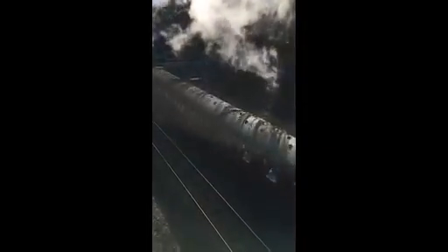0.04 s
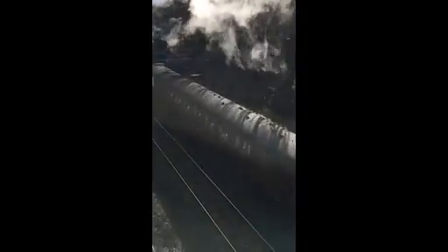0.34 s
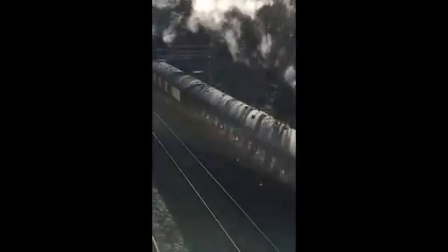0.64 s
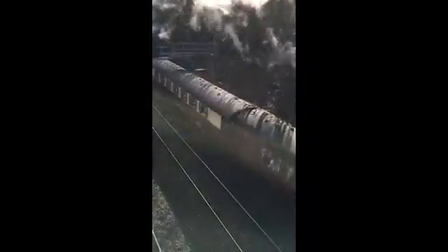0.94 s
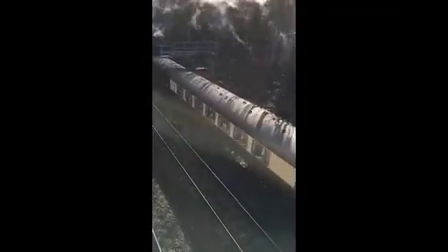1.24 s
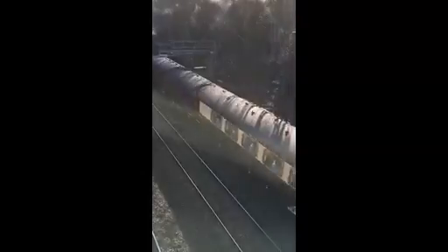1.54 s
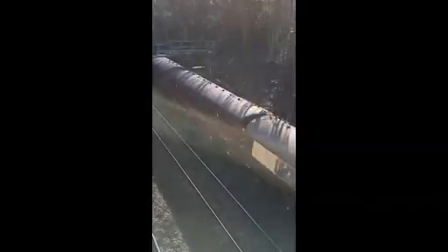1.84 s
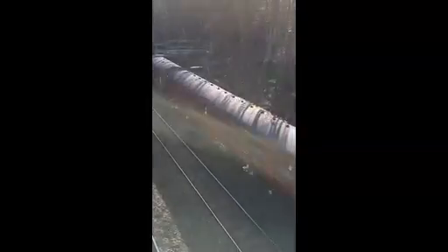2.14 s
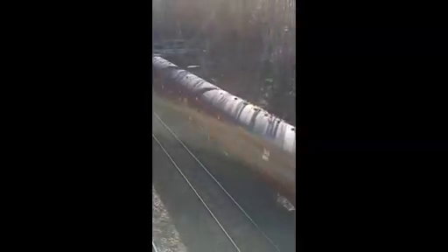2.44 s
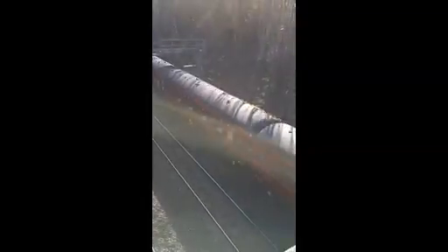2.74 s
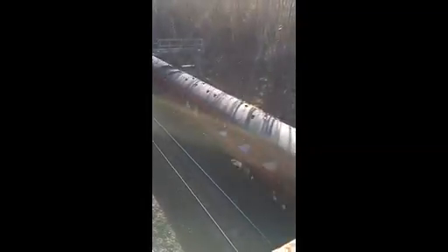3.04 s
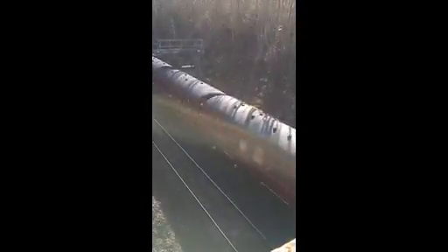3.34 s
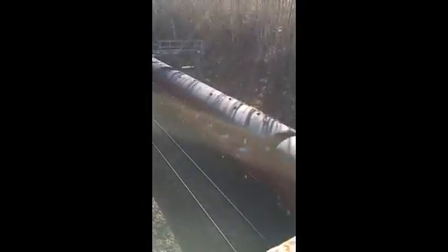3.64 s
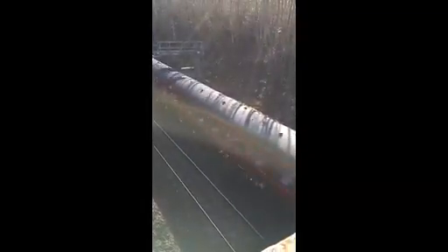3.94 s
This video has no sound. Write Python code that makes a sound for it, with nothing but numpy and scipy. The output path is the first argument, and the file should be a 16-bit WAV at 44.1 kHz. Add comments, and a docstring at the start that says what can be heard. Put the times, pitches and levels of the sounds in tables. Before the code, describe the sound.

A passenger train rolls past with a steady rushing rumble and wheels clattering over rail joints.

```python
"""A train of passenger coaches rolls past below, at a steady speed.
From the start, wheels and rails roar and the running gear knocks dully, over a low drone that
fades after the first second. Five bogies come by in turn, their wheel discs ringing and hissing.
At 1.6 s a coach body thuds heavily once. In the second half the wheels clatter more often over
rail joints and the rails sing; near the end the drone returns faintly."""
import sys
import numpy as np
from scipy import signal
from scipy.fft import rfft, irfft
from scipy.io import wavfile

SR = 44100
rng = np.random.default_rng(int(sys.argv[2]) if len(sys.argv) > 2 else 0)


def unload_wav(signal):
    """Save mono or channel-first audio to the path in sys.argv[1] as 16-bit WAV at rate SR, clipped to [-1, 1]."""
    wavfile.write(
        sys.argv[1],
        SR,
        np.round(np.clip(np.atleast_2d(signal).T, -1, 1) * 32767).astype(np.int16),
    )


N = 176400
T, HZ = np.arange(N) / SR, np.fft.rfftfreq(N, 1 / SR)


# Spectrum of the rails. Each row: frequency in Hz, relative density in dB.
ROAR_SPECTRUM = [(300, -21), (470, -7), (560, -2.5), (680, -1), (780, -5), (920, -3.5), (1080, -9),
                 (1230, -13), (1600, -19), (2300, -31), (2800, -44.5)]
# Envelope of the roar. Each row: time in seconds, relative level in dB.
ROAR_ENVELOPE = [(0, -21), (.4, -17.5), (.56, -19), (.72, -23), (.82, -18.5), (.9, -22.5), (1.3, -18),
                 (1.48, -20.5), (1.72, -19.5), (1.93, -18), (2.25, -19), (2.55, -19.5), (2.75, -18.5),
                 (2.98, -19.5), (3.2, -18), (3.43, -21.5), (3.52, -23), (3.74, -19), (3.9, -17.5),
                 (4, -21.5)]

def rail_roar():
    """Roughness excitation: steel rolling on steel drives the rails over a broad band."""
    roar = noise(colour(ROAR_SPECTRUM)) * level(ROAR_ENVELOPE)
    return roar * waver(rate_hz=18, depth_db=1.28) * amp(-2)


# Modes of a wheel disc. Each row: frequency in Hz, width in Hz, relative level in dB.
DISC_MODES = [(688, 50, -30.5), (1389, 120, -40.5), (1870, 164, -34), (2487, 170, -40.5), (3210, 190, -41),
              (3990, 280, -47), (5800, 710, -56.5)]
# Passing bogies. Each row: time when nearest and half length in seconds, then each mode's gain in dB.
BOGIE_PASSES = [(.17, 0.22, 4, 11.5, -2.5, 3.5, 2.5, -4, 0), (1.12, 0.49, -9, 8.5, -5.5, -2, -2.5, -9, -2),
                (2.03, 0.28, -4, -3, 0.5, 2, -0.5, 0.5, -2), (2.72, 0.24, -12, -1, 3.5, 4.5, 4.5, 6.5, 6.5),
                (3.48, 0.28, -5, -8, 1, -1.5, -1.5, 3.5, 2)]

def wheel_ring():
    """Modal resonance: randomly driven wheel discs ring, swelling as each bogie passes."""
    out = np.zeros(N)
    for nearest, half, *gains_db in BOGIE_PASSES:
        modes = zip(DISC_MODES, gains_db)
        ring = sum(amp(db + gain_db) * ringing(hz, width) for (hz, width, db), gain_db in modes)
        out += ring * swell(nearest, half)
    return out * waver(rate_hz=27, depth_db=1)


# Spectra of the contact's hiss and brighter fizz. Each row: frequency in Hz, relative density in dB.
HISS_SPECTRUM = [(700, -1.5), (1250, 0), (1600, -0.5), (2120, 1.5), (2290, -2.5), (2600, -2.5), (2770, -7),
                 (2950, -10), (3150, -7.5), (3750, -9.5), (4400, -22), (5000, -26), (7000, -47)]
FIZZ_SPECTRUM = [(1500, -21.5), (3000, -0.5), (3800, 4), (4400, 3.5), (5000, -1.5), (5800, -1), (6600, -4),
                 (7600, -9), (10000, -16)]
# Their envelopes. Each row: time in seconds, relative level in dB.
HISS_ENVELOPE = [(0, -34), (.12, -40), (.3, -37), (.5, -39.5), (.82, -39), (.98, -39), (1.2, -39),
                 (1.42, -40), (1.7, -39), (2.15, -38.5), (2.4, -38.5), (2.75, -39.5), (3.15, -40),
                 (3.45, -41), (3.7, -39.5), (3.92, -42), (4, -38.5)]
FIZZ_ENVELOPE = [(0, -44.5), (.12, -41.5), (.45, -46), (.77, -48), (.95, -43), (1.17, -42.5), (1.43, -47.5),
                 (1.72, -46.5), (1.87, -45), (2.23, -41.5), (2.38, -46), (2.7, -42), (2.9, -44.5),
                 (3.12, -47), (3.43, -43), (3.9, -46.5), (4, -48.5)]

def contact_hiss():
    """Contact noise: roughness between wheel and rail excites the high frequencies."""
    hiss = noise(colour(HISS_SPECTRUM)) * level(HISS_ENVELOPE) * waver(rate_hz=36, depth_db=1)
    fizz = noise(colour(FIZZ_SPECTRUM)) * level(FIZZ_ENVELOPE) * waver(rate_hz=14, depth_db=0.7)
    return hiss * amp(10.5) + fizz * amp(3.5)


# Knocks of the running gear. Each row: start in seconds, level in dB, centre in Hz, decay in seconds.
GEAR_KNOCKS = [(.259, -17.5, 370, .13), (.661, -14.5, 400, .057), (.729, -18, 176, .085),
               (1.512, -13.5, 368, .06), (1.598, -25, 88, .2), (1.616, -20.5, 195, .12),
               (1.619, -20, 360, .06), (1.648, -20.5, 72, .17), (1.764, -16, 338, .08),
               (1.956, -15.5, 225, .085), (2.184, -15.5, 176, .115), (2.243, -17.5, 168, .1),
               (2.31, -20, 176, .075), (2.809, -21, 365, .13), (3.54, -18.5, 289, .11)]

def gear_knocks():
    """Damped oscillation: each impact rings one low mode that sags in pitch, with a rattle around it."""
    rise_s, sag_s, sag_fraction = .012, .02, .1
    out = np.zeros(N)
    for start, db, hz, decay_s in GEAR_KNOCKS:
        pitch = hz * (1 - sag_fraction * np.tanh((T - start - rise_s) / sag_s))
        tone = np.sqrt(2) * np.sin(2 * np.pi * (np.cumsum(pitch) / SR + rng.random()))
        rattle = amp(-15) * ringing(hz, width=.57 * hz)
        out += amp(db) * blow(start, rise_s, decay_s) * (tone + rattle)
    return out


# Spectrum of a joint impact. Each row: frequency in Hz, relative density in dB.
JOINT_SPECTRUM = [(200, -12), (500, -15), (750, 9.5), (1100, -16.5), (2000, -14.5), (4000, -34.5),
                  (9000, -47)]
# Joint impacts. Each row: start in seconds, level in dB.
JOINT_IMPACTS = [(.535, -21), (1.919, -19.5), (1.956, -21.5), (2.163, -19), (2.192, -18.5), (2.236, -18.5),
                 (2.795, -21.5), (2.935, -21), (2.999, -20.5), (3.488, -20.5)]

def joint_clatter():
    """Impact excitation: a wheel dropping over a rail joint gives a short burst of noise."""
    bursts = sum(amp(db) * blow(start, rise_s=.014, decay_s=.14) for start, db in JOINT_IMPACTS)
    return noise(colour(JOINT_SPECTRUM)) * bursts


# Spectrum of the sleepers. Each row: frequency in Hz, relative density in dB.
BOOM_SPECTRUM = [(130, -24.5), (230, -7), (315, 0), (400, -1), (470, -3.5), (600, -13.5), (1000, -27)]
# Envelope of the boom. Each row: time in seconds, level in dB.
BOOM_ENVELOPE = [(0, -24.5), (.3, -24.5), (.6, -26.5), (1.2, -23), (1.9, -22.5), (2.4, -26), (2.9, -23.5),
                 (3.3, -26.5), (3.7, -25.5), (4, -28.5)]

def sleeper_boom():
    """Forced vibration: the rails shake the sleepers, which boom."""
    return noise(colour(BOOM_SPECTRUM)) * level(BOOM_ENVELOPE)


# Spectrum of the coach bodies. Each row: frequency in Hz, relative density in dB.
RUMBLE_SPECTRUM = [(22, -21), (30, -22), (40, -5.5), (55, -3.5), (110, -2.5), (165, 3.5), (240, -0.5),
                   (400, -13), (900, -26)]
# Envelope of the rumble. Each row: time in seconds, relative level in dB.
RUMBLE_ENVELOPE = [(0, -36), (.25, -28.5), (1.0, -29.5), (1.6, -29), (2.4, -31), (2.8, -28), (3.4, -32.5),
                   (4, -31.5)]

def coach_rumble():
    """Structure-borne sound: rolling makes the coach bodies rumble."""
    rumble = noise(colour(RUMBLE_SPECTRUM)) * level(RUMBLE_ENVELOPE)
    return rumble * waver(rate_hz=11, depth_db=1) * amp(-1.3)


# Singing rails. Each row: peak time and half length in seconds, frequency and width in Hz, level in dB.
RAIL_RESONANCES = [(2.47, 0.028, 1830, 170, -29), (2.58, 0.03, 2030, 120, -29), (2.25, .4, 1855, 105, -37),
                   (3.38, .38, 1905, 115, -35.5), (3.47, .24, 3280, 115, -42),
                   (3.007, 0.055, 562, 60, -24.5), (3.65, 0.25, 630, 50, -27)]

def rail_song():
    """Narrow-band resonance: modes of the rails swell out of the roar and sink back."""
    return sum(amp(db) * swell(peak, half) * ringing(hz, width)
               for peak, half, hz, width, db in RAIL_RESONANCES)


# Envelope of the drone. Each row: time in seconds, relative level in dB.
DRONE_ENVELOPE = [(0, -35), (.18, -43), (.33, -33.5), (.9, -33.5), (1.05, -43), (3.1, -53), (3.4, -38.5),
                  (4, -45.5)]

def train_drone():
    """Random frequency modulation: a low tone wanders, and a band of noise flutters around it."""
    centre_hz, wander_hz = 63.35, 2
    pitch = centre_hz + wander_hz * noise(np.exp(-(HZ / 5) ** 2))
    tone = np.sqrt(2) * np.sin(2 * np.pi * np.cumsum(pitch) / SR)
    flutter = amp(-1) * ringing(centre_hz, width=24)
    return (tone + flutter) * level(DRONE_ENVELOPE)


def amp(db):
    """Decibel law: 20 dB is a tenfold amplitude."""
    return 10 ** (np.asarray(db) / 20)


def noise(gain):
    """Spectral shaping: unit-power noise with the given gain at each frequency."""
    x = irfft(gain * rfft(rng.standard_normal(N)), N)
    return x / np.sqrt(np.mean(x ** 2) + 1e-20)


def colour(points):
    """Spectral envelope: gain interpolated in log frequency, rolling off past the last point."""
    hz, db = np.transpose(points)
    return amp(np.interp(np.log(HZ + 1), np.log(hz), db)) / np.hypot(1, (HZ / hz[-1] / 2) ** 2)


def ringing(hz, width):
    """Random excitation of a resonance with steep skirts."""
    return noise((1 + ((HZ - hz) / width) ** 2) ** -1.5)


def level(points):
    """Amplitude envelope: gain interpolated in dB over time."""
    return amp(np.interp(T, *np.transpose(points)))


def waver(rate_hz, depth_db):
    """Amplitude modulation: a gain that wanders at random."""
    return amp(depth_db * noise(np.exp(-(HZ / rate_hz) ** 2) * (HZ > 1)))


def swell(peak, half):
    """Gaussian envelope: a smooth rise and fall around one moment."""
    return np.exp(-.5 * ((T - peak) / half) ** 2)


def blow(start, rise_s, decay_s):
    """Exponential decay: a linear rise, then a fall of 60 dB in the decay time."""
    age = np.maximum(T - start, 0)
    return np.minimum(age / rise_s, 1) * np.exp(-np.log(1000) * np.maximum(age - rise_s, 0) / decay_s)


def scene():
    """Superposition: all sources add at one microphone."""
    foreground = rail_roar() + wheel_ring() + contact_hiss() + gear_knocks() + joint_clatter()
    background = sleeper_boom() + coach_rumble() + rail_song() + train_drone()
    return (foreground + background)[None]


def record(dry):
    """Band limiting: the microphone cuts below 33 Hz and the recorder above 10400 Hz."""
    highpass = signal.butter(2, 33, "high", fs=SR, output="sos")
    lowpass = signal.firwin(401, 10400, window=("kaiser", 9), fs=SR)
    return signal.oaconvolve(signal.sosfilt(highpass, dry), lowpass[None], "same")


dry = scene()
out = record(dry)
unload_wav(out)
```